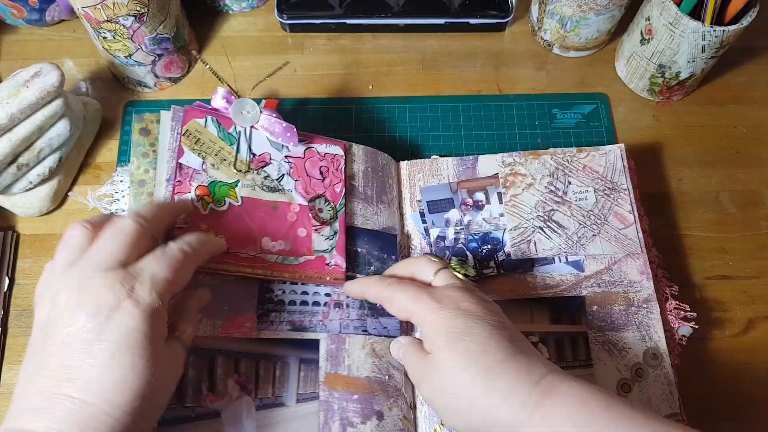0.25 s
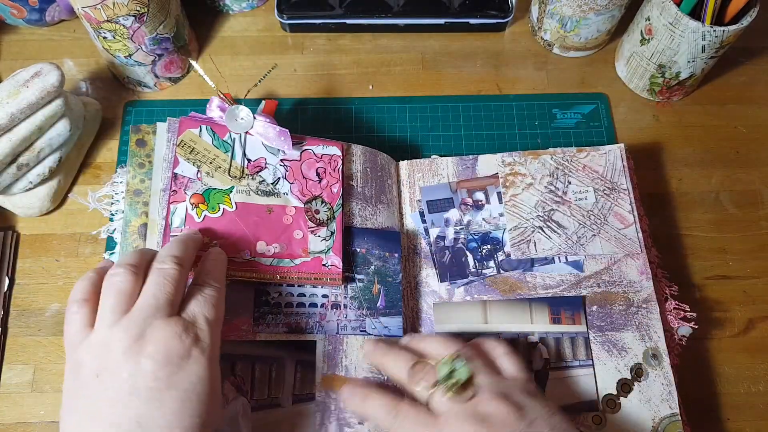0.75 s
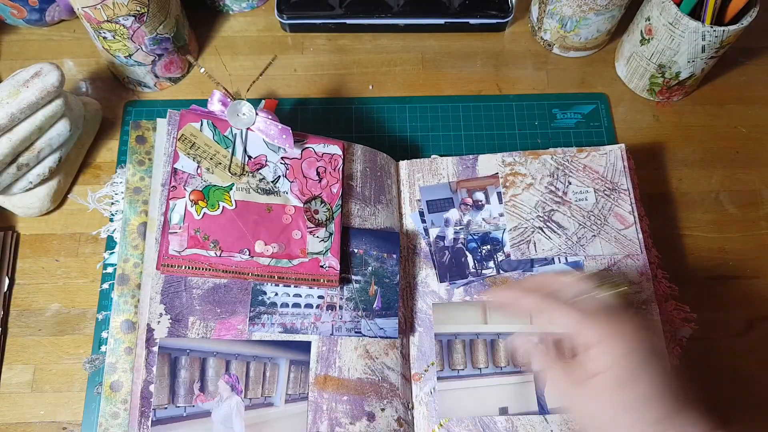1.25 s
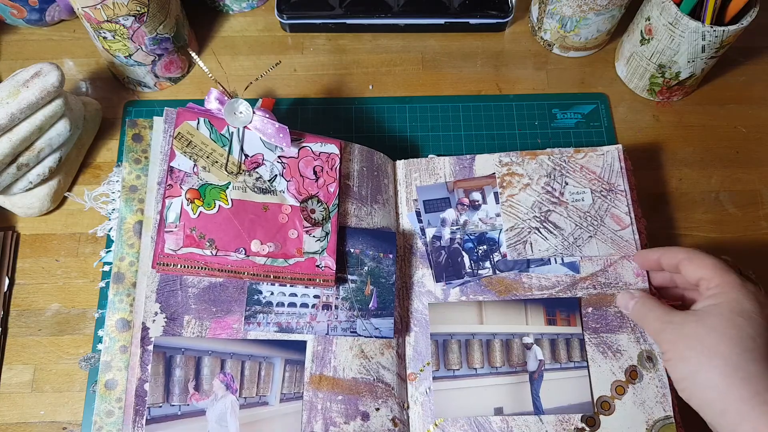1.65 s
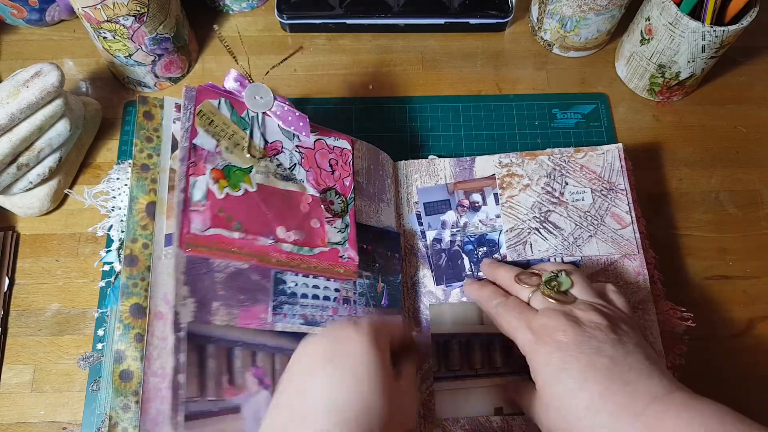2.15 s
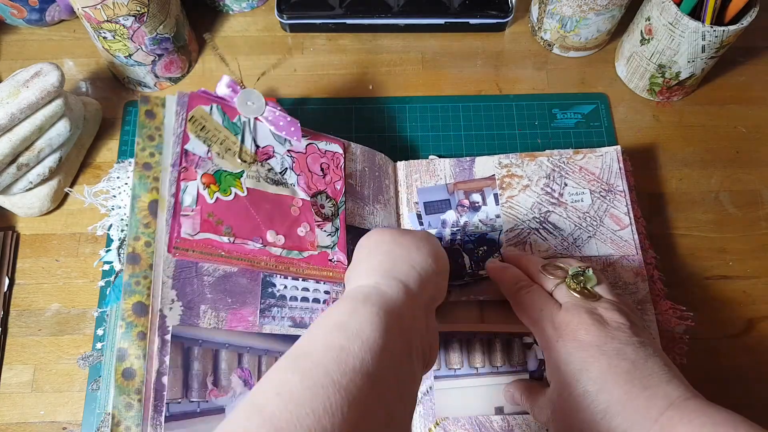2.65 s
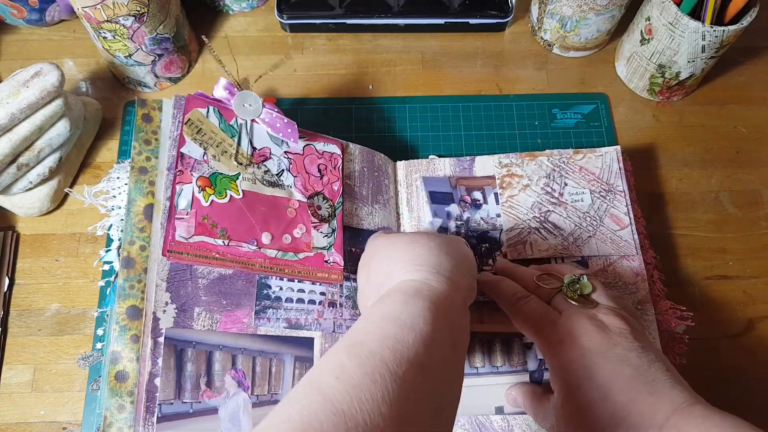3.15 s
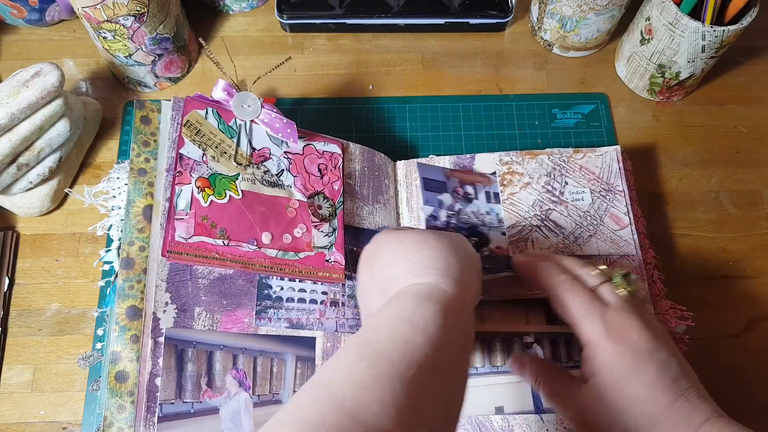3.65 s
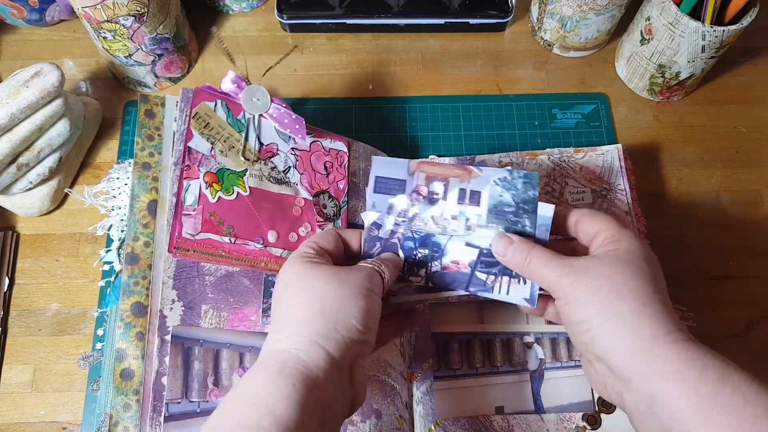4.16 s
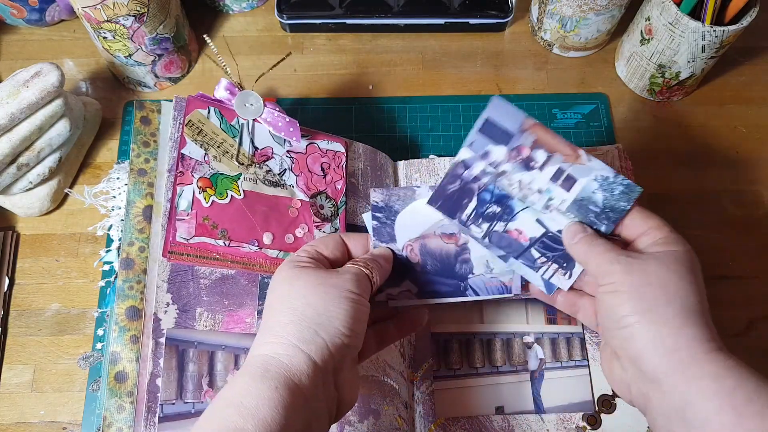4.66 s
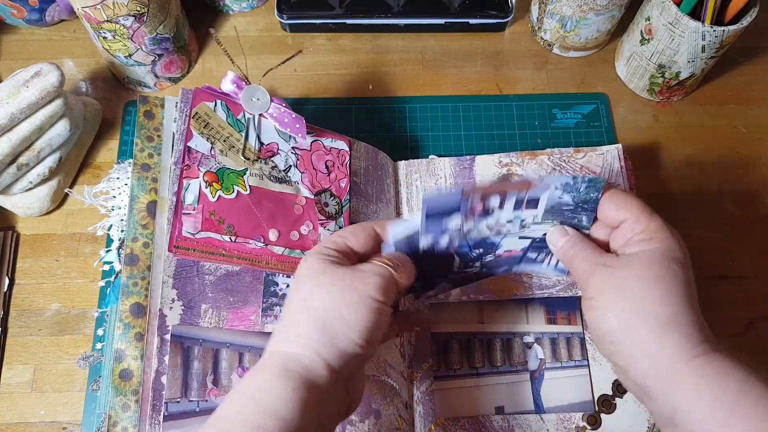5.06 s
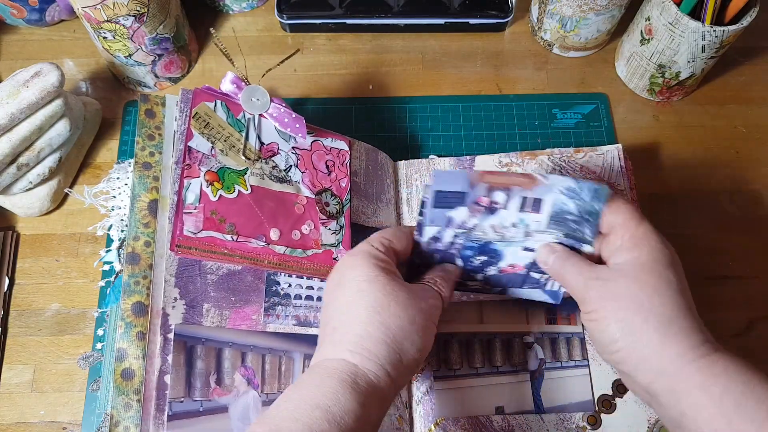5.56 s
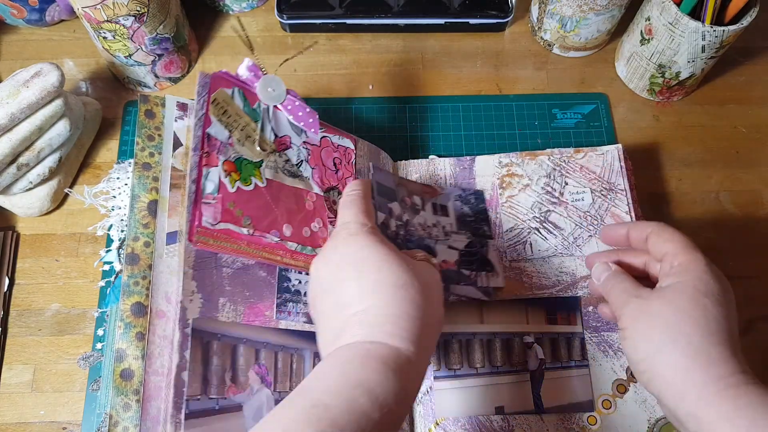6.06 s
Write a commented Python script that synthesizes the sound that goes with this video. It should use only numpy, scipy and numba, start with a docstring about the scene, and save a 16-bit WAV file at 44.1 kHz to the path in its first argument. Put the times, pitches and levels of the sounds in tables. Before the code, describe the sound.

Fingers handle the pages of a thick journal on a table, making soft rustles and small crinkles. After a quieter moment they rub inside a paper pocket, with a slightly hollow scraping and crisp snaps. Photos slide apart with a thin hiss, then are knocked square in one quick, much louder clatter. More rustling follows. The sound is close, in a quiet room with a faint low hum.

```python
"""Fingers rustle through the pages of a thick handmade journal on a table, over a quiet room hum.
They rub in a paper pocket; glossy photos slide out, fan apart and are knocked square on the page.
Fibres slip in dense tiny jerks that hiss from the sheet and ring the hollows between pages;
creases snap, faint whistles waver in the hiss, and the photos' edges ring the book."""
import sys
import numpy as np
from scipy import signal
from scipy.fft import rfft, irfft
from scipy.io import wavfile
from scipy.ndimage import uniform_filter1d
from numba import njit

SR = 44100
rng = np.random.default_rng(int(sys.argv[2]) if len(sys.argv) > 2 else 0)


def pcm_store(signal):
    """Save signal as 16-bit PCM."""
    levels = np.round(np.clip(np.atleast_2d(signal), -1, 1) * 32767)
    wavfile.write(sys.argv[1], SR, levels.astype(np.int16).T)


N = 278712
LEAN_DB = 3.5  # left over right


def undb(db):
    return 10 ** (np.asarray(db) / 20)


def unit(x):
    return x / np.sqrt(np.mean(x ** 2))


def decay(t, t60_s):
    return np.exp(-np.log(1000) * t / t60_s)


def band(x, lo_hz, hi_hz, order=2):
    sos = signal.butter(order, [lo_hz, min(hi_hz, .45 * SR)], "band", fs=SR, output="sos")
    return signal.sosfilt(sos, x)


def curves(rows):
    """Rows of (time in seconds, values..) as one sample-rate curve per value."""
    times_s, *columns = np.transpose(rows)
    return [np.interp(np.arange(N) / SR, times_s, column) for column in columns]


def flicker(rate_hz):
    """Ramps between random levels; spread near 1."""
    hold = int(SR / rate_hz)
    return 1.2 * uniform_filter1d(np.repeat(rng.standard_normal(N // hold + 1), hold), hold)[:N]


def stereo(mid, side, width):
    """Left and right from mid and side, leaning left."""
    sign = np.array([[1], [-1]])
    return (mid + width * sign * side) * undb(sign * LEAN_DB / 2)


def fibre_slips(per_s, spread_db, friction, patchy_db):
    """Stick-slip jerks of paper fibres, a few much larger than the rest, over smooth friction; rms 1."""
    chance, size, noise = rng.random(N), rng.exponential(size=N), rng.standard_normal(N)
    jerks = (chance < per_s / SR) * undb(spread_db * np.minimum(size, 4)) * np.sign(noise)
    return unit((unit(jerks) + friction * noise) * undb(patchy_db * flicker(80)))


# Each row: peak time, 20 dB rise and 20 dB fall in seconds, rustle level in dB, low part, high part
# and hiss in dB re rustle, top octave in dB re hiss, thud in dB re rustle.
PAPER_STROKES = [(0.029, 0.068, 0.15, -77, -13, -1, 11.5, 11, -30),
                 (0.088, 0.057, 0.09, -52, -22, -6, -4.5, 1.5, -28),
                 (0.155, 0.048, 0.075, -59, 2, -5, -13, 8, -27),
                 (0.214, 0.36, 0.12, -60, 0.5, -1, -3, 1.5, -17),
                 (0.313, 0.049, 0.091, -67.5, 2.5, -1.5, 5.5, -2, -2),
                 (0.435, 0.0067, 0.145, -85.5, -12, 4, 16.5, 3.5, -26),
                 (0.504, 0.089, 0.055, -70.5, -9, -5, 2.5, -1, -30),
                 (0.649, 0.038, 0.14, -70.5, -0.5, -3.5, -7.5, -9, 6.5),
                 (0.788, 0.013, 0.12, -67.5, 7, 4, 2, 0.5, 1),
                 (1.14, 0.13, 0.11, -74.5, -4, 3, 3.5, 3.5, -32),
                 (1.556, 0.022, 0.062, -92.5, 0, -14, 6, 16, -5),
                 (1.624, 0.11, 0.15, -79.5, 6.5, 6, 3, -15, 1),
                 (1.75, 0.2, 0.13, -90.5, -3, -6, -25, -7, 22),
                 (1.931, 0.02, 0.39, -65.5, -11, -27, -16.5, 6, -8.5),
                 (2.122, 0.16, 0.062, -62, -10, -10, -0.5, -3, -32),
                 (2.297, 0.025, 0.45, -69.5, -8, 1.5, 6, 0.5, -11),
                 (2.397, 0.02, 0.11, -47, 4.5, -3.5, -12.5, -1, -21),
                 (2.47, 0.02, 0.069, -62.5, -1, -1, 3, -11, -20),
                 (2.528, 0.084, 0.026, -50, -17, -3.5, -2.5, -13, -17),
                 (2.604, 0.056, 0.19, -45.5, -3.5, -4, -4, -8, -30),
                 (2.654, 0.065, 0.045, -47, 0.5, 5, -11, -2, -15),
                 (2.727, 0.23, 0.067, -53, -22, 2.5, -4, 3, -24),
                 (2.789, 0.019, 0.12, -52.5, 4.5, -1, -20, 1, -29),
                 (2.852, 0.052, 0.047, -47, 11.5, 4.5, -8.5, -4, -5),
                 (2.914, 0.045, 0.078, -69, -11, 6.5, 6.5, 1.5, -1),
                 (3.038, 0.04, 0.2, -65.5, -6, 8, 3.5, -22, -30),
                 (3.1, 0.043, 0.057, -60.5, 13, 4.5, 1, -23, -15),
                 (3.14, 0.09, 0.087, -64, -16, 1, 4.5, -5, -1),
                 (3.35, 0.043, 0.065, -71, -23, 2, 4, -2.5, -30),
                 (3.487, 0.018, 0.12, -54.5, -1, -9, -8, -16, -3.5),
                 (3.528, 0.014, 0.044, -48.5, -14, 5.5, -1.5, 3, -28),
                 (3.656, 0.09, 0.19, -61.5, -14, 7.5, 1, 7.5, -32),
                 (3.689, 0.0087, 0.082, -54, 2, 0, -0.5, -14, 0),
                 (3.777, 0.121, 0.14, -61.5, -6.5, 7, 10.5, 1, -14),
                 (3.857, 0.3, 0.14, -59, -14.5, 3.5, 2.5, -6.5, -30),
                 (4.027, 0.014, 0.075, -65, 2.5, 5.5, 1.5, 7, -1),
                 (4.122, 0.026, 0.03, -73.5, -6, -20, 1.5, 9, -14),
                 (4.229, 0.13, 0.72, -80.5, -10, -9, 0.5, 11.5, 4),
                 (4.435, 0.062, 0.14, -60, -17, -12, -4, 4.5, -10),
                 (4.668, 0.33, 0.055, -79.5, -7, -13, 13.5, 1.5, -30),
                 (4.766, 0.11, 0.16, -83.5, 0, -3, 15, 2, -23),
                 (4.874, 0.014, 0.37, -84.5, 2, -7, 8, 7, -30),
                 (4.96, 0.018, 0.076, -74.5, -18, 1, 4, -18, -30),
                 (5.194, 0.31, 0.56, -82.5, -6, -3, 3.5, -3, -30),
                 (5.308, 0.015, 0.097, -42, 3.5, -3, -9.5, -16, -23),
                 (5.442, 0.062, 0.038, -47, 1, 0.5, -0.5, -4.5, 2.5),
                 (5.504, 0.038, 0.068, -56.5, -2, 1, 2.5, -4, 5),
                 (5.632, 0.27, 0.051, -61.5, -15, -9, 2, -3, -23),
                 (5.693, 0.058, 0.076, -61, -26, -6.5, -4, 4, -16),
                 (5.737, 0.0077, 0.099, -62, -4, -7, 4, -4, 2),
                 (5.952, 0.022, 0.3, -53, -1, 1, -6.5, -10, -12.5),
                 (6.069, 0.11, 0.19, -50, -4, 0.5, -3.5, -8, -33),
                 (6.185, 0.2, 0.36, -57.5, 1.5, 8.5, 3.5, -7.5, -11)]


def stroke_gains(*parts_db):
    """Each stroke of hand or photo swells and dies; overlaps add in power. One gain curve per part."""
    peak_s, rise_s, fall_s = np.transpose(PAPER_STROKES)[:3, :, None]
    grid = np.arange(0, N + 64, 64)
    late_s = grid / SR - peak_s
    shape_db = -20 * np.where(late_s < 0, -late_s / rise_s, late_s / fall_s)
    gains = np.sqrt(undb(parts_db) ** 2 @ undb(shape_db) ** 2)
    return [np.interp(np.arange(N), grid, gain) for gain in gains]


@njit
def resonate(x, hz, q):
    """State-variable band-pass with a moving centre, gain 1 there."""
    y, band_state, low_state = np.empty(len(x)), 0., 0.
    for i in range(len(x)):
        g = np.tan(np.pi * hz[i] / SR)
        passed = (band_state + g * (x[i] - low_state)) / (1 + g * (g + 1 / q))
        band_state = 2 * passed - band_state
        low_state += 2 * g * passed
        y[i] = passed / q
    return y


# Air enclosed between pages. Each row: start and end in seconds, low, middle and high resonance in Hz,
# closure from 0 to 1.
PAGE_HOLLOWS = [(0.0, 0.364, 770, 1230, 2220, 0.2), (0.617, 0.89, 465, 1226, 2060, 0.32),
                (1.957, 2.157, 840, 1235, 2510, 0.16), (2.38, 2.54, 562, 1100, 2750, 0.06),
                (2.563, 2.767, 493, 1430, 2675, 0.43), (2.791, 2.984, 734, 1773, 2390, 0.42),
                (3.06, 3.18, 570, 1520, 2280, 0.3), (5.927, 6.325, 800, 1840, 2650, 0)]
# Q of the low, middle and high resonance.
RESONANCE_Q = (11, 16.4, 9.6)
# Low, middle and high part of the rustle. Each row: lower and upper edge in Hz.
RUSTLE_BANDS_HZ = ((350, 880), (1000, 1970), (2000, 3350))


def finger_rub():
    """Coarse jerks rustle, heavy pages thud, and hollows ring where pages close round the fingers."""
    db, low_db, high_db, _, _, thud_db = np.transpose(PAPER_STROKES)[3:]
    low_gain, middle_gain, high_gain, thud_gain = stroke_gains(db + low_db, db, db + high_db, db + thud_db)
    *hollow_hz, closure = curves([(s, *air) for start, end, *air in PAGE_HOLLOWS for s in (start, end)])
    t = np.arange(N) / SR
    inside = sum((t > start) & (t < end) for start, end, *_ in PAGE_HOLLOWS)
    closure = np.clip(uniform_filter1d(closure * inside, size=400), 0, .9)
    layers = []
    for _ in range(2):
        slips = fibre_slips(per_s=1300, spread_db=3.2, friction=1.1, patchy_db=1.6)
        rings = [unit(resonate(resonate(slips, hz, q), hz, q / 2))
                 for hz, q in zip(hollow_hz, RESONANCE_Q)]
        rustles = [unit(band(slips, *edges)) for edges in RUSTLE_BANDS_HZ]
        low, middle, high = (np.sqrt(closure) * ring + np.sqrt(1 - closure) * rustle
                             for ring, rustle in zip(rings, rustles))
        thud = unit(band(slips, 160, 343))
        # Adjacent bands meet in opposite phase, so the middle is inverted.
        layers.append(low_gain * low - middle_gain * middle + high_gain * high + thud_gain * thud)
    bright_side = signal.lfilter([1, -.8], 1, layers[1])
    return stereo(layers[0], bright_side, width=1.96)


def sheet_slide():
    """Fine, dense jerks hiss as one sheet drags over another."""
    db, _, _, hiss_db, top_db, _ = np.transpose(PAPER_STROKES)[3:]
    hiss_gain, top_gain = stroke_gains(db + hiss_db, db + hiss_db + top_db)
    layers = []
    for _ in range(2):
        slips = fibre_slips(per_s=3000, spread_db=3.5, friction=1.3, patchy_db=1.1)
        hiss, top = unit(band(slips, 3210, 7350)), unit(band(slips, 7350, 15600))
        layers.append(hiss_gain * hiss - top_gain * top)
    return stereo(*layers, width=1)


def shaped_noise(spectrum):
    """Steady noise from rows of (Hz, dB); rms 1."""
    hz, db = np.transpose(spectrum)
    bins_hz = np.arange(N // 2 + 1) * SR / N + 1
    bins_db = np.interp(np.log(bins_hz), np.log(hz), db, -120, -120)
    return unit(irfft(rfft(rng.standard_normal(N)) * undb(bins_db), N))


# Room hum. Each row: time in seconds, rumble level in dB, drone level in dB.
HUM_LEVELS = [(0.0, -72, -75.5), (0.26, -67.5, -67), (0.56, -81, -76.5), (0.77, -72, -64.5),
              (1.14, -79, -76.5), (1.78, -78, -70.5), (2.36, -70, -72.5), (2.66, -69, -64.5),
              (3.26, -67, -73.5), (3.98, -64, -71.5), (4.89, -67.5, -76.5), (5.28, -64, -73.5),
              (5.54, -62, -65), (6.04, -67, -61), (6.32, -67, -67.5)]
# Drone and air spectra. Each row: frequency in Hz, relative density in dB.
DRONE_SPECTRUM = [(47, -78), (80, -3), (124, 4), (172, -21.5), (265, -1.5), (447, -6.5), (533, -18.5),
                  (600, -43), (780, -66), (1320, -120)]
AIR_SPECTRUM = [(500, -0.5), (1200, 0), (2600, -7), (4000, -11.5), (8000, -14), (12000, -6), (15800, -8)]


def room_tone():
    """A throbbing rumble near 50 Hz and a low drone, both nearly mono, under faint wide air."""
    rumble_db, drone_db = curves(HUM_LEVELS)
    rumble = stereo(*[unit(band(rng.standard_normal(N), 36.2, 62.2)) for _ in range(2)], width=0.2)
    drone = stereo(shaped_noise(DRONE_SPECTRUM), shaped_noise(DRONE_SPECTRUM), width=0.27)
    air_db = -80 + .5 * flicker(2.8)
    air = stereo(shaped_noise(AIR_SPECTRUM), shaped_noise(AIR_SPECTRUM), width=1)
    return undb(rumble_db) * rumble + undb(drone_db) * drone + undb(air_db) * air


def crack(noise, t60_s):
    """A bright burst that dies quickly."""
    t = np.arange(len(noise)) / SR
    return .4 * band(noise * decay(t, t60_s), 2930, 13500)


# Creases and taps. Each row: start in seconds, ring peak in dB, pitch in Hz, crack in dB re ring,
# T60 in seconds.
CREASES = [(0.027, -53.5, 1930, 31.5, 0.0057), (0.081, -46, 1660, 6.5, 0.052),
           (0.098, -54, 2200, 15, 0.045), (0.247, -41.5, 1100, -7, 0.017), (0.31, -49, 760, -9, 0.028),
           (0.431, -63.5, 4900, 22.5, 0.015), (0.634, -63.5, 1120, 10, 0.02),
           (0.731, -68, 885, 14.5, 0.039), (0.781, -61, 1180, 11.5, 0.048), (1.557, -66, 501, 6, 0.02),
           (1.608, -52.5, 2050, 2, 0.019), (1.907, -61, 1670, -23, 0.021), (1.928, -57.5, 1620, -9, 0.032),
           (2.378, -47, 900, 0, 0.015), (2.392, -41.5, 570, -14, 0.031), (2.401, -41, 590, -3, 0.041),
           (2.571, -41, 830, 4, 0.017), (2.587, -34, 1540, 1, 0.032), (2.777, -62, 834, -6, 0.022),
           (2.884, -31, 770, -9, 0.015), (3.006, -62, 1200, 8, 0.016), (3.064, -38.5, 690, -17, 0.024),
           (3.089, -39.5, 510, -17, 0.11), (3.469, -52.5, 507, -23, 0.022), (3.491, -48, 840, 8, 0.077),
           (3.513, -33, 1905, -6, 0.028), (3.645, -54, 2100, 20.5, 0.041), (3.685, -27.5, 2250, -6, 0.024),
           (3.857, -55, 1320, 6, 0.027), (4.03, -37, 1470, 2.5, 0.024), (4.119, -73, 1280, -4, 0.022),
           (4.229, -59, 505, 11, 0.057), (4.256, -68, 590, 1, 0.014), (4.618, -52, 4640, 7, 0.021),
           (4.657, -52, 4470, 13, 0.048), (4.874, -63.5, 1490, 19, 0.028), (4.964, -63, 3140, -2, 0.044),
           (5.45, -39.5, 1350, 10.5, 0.015), (5.498, -34.5, 1510, 1.5, 0.075),
           (5.628, -44.5, 4120, -1, 0.066), (5.739, -41, 3020, 11.5, 0.024), (5.963, -39, 496, -19, 0.071),
           (5.976, -39.5, 1780, -3, 0.024)]
HIT_SAMPLES = 4096


def crease_snaps():
    """Each crease gives a short dull ring around its pitch and a bright crack."""
    out, t = np.zeros((2, N + HIT_SAMPLES)), np.arange(HIT_SAMPLES) / SR
    for start_s, db, hz, crack_db, t60_s in CREASES:
        ring_noise, crack_noise = rng.standard_normal((2, 2, HIT_SAMPLES))
        envelope = (1 - np.exp(-t / 0.0006)) * decay(t, t60_s)
        rings = band(ring_noise, hz / 1.9, hz * 1.47) * envelope
        rings /= np.abs(rings[0]).max()
        cracks = undb(crack_db) * np.array([crack(noise, t60_s) for noise in crack_noise])
        i = int(start_s * SR)
        out[:, i:i + HIT_SAMPLES] += undb(db) * stereo(*(rings + cracks), width=0.5)
    return out[:, :N]


# Each row: start in seconds, length in seconds, pitch in Hz, level in dB.
THIN_WHISTLES = [(4.453, 0.071, 3500, -69), (4.593, 0.033, 3900, -77), (4.644, 0.12, 2560, -76),
                 (4.82, 0.025, 3510, -66.5)]


def thin_whistles():
    """Faint, brief, narrow whistles at 2.5-4 kHz waver in the sliding hiss."""
    out, t = np.zeros(N), np.arange(N) / SR
    for start_s, length_s, hz, db in THIN_WHISTLES:
        swell = np.sin(np.pi * np.clip((t - start_s) / length_s, 0, 1))
        out += undb(db) * swell * unit(band(rng.standard_normal(N), hz - 90, hz + 90))
    return stereo(out, 0, width=0)


# Photo edges landing. Each row: start in seconds, ring peak in dB, crack in dB re ring.
EDGE_LANDINGS = [(5.278, -18.5, -15), (5.283, -11.5, -11), (5.287, -26, -11), (5.2909, -12, -21),
                 (5.2939, -18.5, -2), (5.2990, -21, -21), (5.3122, -15.5, -33), (5.3206, -23, -35),
                 (5.324, -27.5, -31), (5.3310, -30, -24), (5.334, -32, -24)]
# Each row: frequency in Hz, relative level in dB before the bass cut, T60 in seconds.
BOOK_MODES = [(250, -45, 0.022), (550, 0, 0.1), (645, -7, 0.031), (850, 9.5, 0.021), (1055, 9.5, 0.011),
              (1510, 8.5, 0.011), (2160, 4.5, 0.008), (3480, 1, 0.003)]


def photo_knocks():
    """The photos land edge first, a few at a time; each blow favours other modes of the thick book."""
    out, t = np.zeros((2, N + HIT_SAMPLES)), np.arange(HIT_SAMPLES) / SR
    for start_s, db, crack_db in EDGE_LANDINGS:
        scatter_db = rng.normal(0, 2.5, len(BOOK_MODES))
        tunings = rng.normal(1, 0.017, len(BOOK_MODES))
        ring = sum(undb(mode_db + extra_db) * np.sin(2 * np.pi * hz * tuning * t) * decay(t, t60_s)
                   for (hz, mode_db, t60_s), extra_db, tuning in zip(BOOK_MODES, scatter_db, tunings))
        ring = band(ring, 400, 9000)  # small sheets push little bass
        ring /= np.abs(ring).max()
        cracks = [undb(crack_db) * crack(rng.standard_normal(HIT_SAMPLES), t60_s=.014) for _ in range(2)]
        i = int(start_s * SR)
        out[:, i:i + HIT_SAMPLES] += undb(db) * stereo(ring + cracks[0], cracks[1], width=0.7)
    return out[:, :N]


def reflections(sound, t60_s, level_db):
    """The table top and near walls return a short, dull tail."""
    t = np.arange(SR // 2) / SR
    tail = band(rng.standard_normal((2, len(t))), 450, 3900, order=1) * decay(t, t60_s) * (t > .003)
    tail /= np.sqrt(np.sum(tail ** 2, axis=1, keepdims=True))
    return undb(level_db) * signal.fftconvolve(sound, tail, axes=1)[:, :N]


def scene():
    paper = sheet_slide() + finger_rub() + crease_snaps() + photo_knocks() + thin_whistles()
    return paper + reflections(paper, t60_s=0.056, level_db=-13) + room_tone()


def record(dry):
    """The phone drops the deepest bass and cuts the top steeply."""
    low_cut_hz, high_cut_hz = 36, 15850
    thin = signal.sosfilt(signal.butter(3, low_cut_hz, "high", fs=SR, output="sos"), dry)
    return signal.sosfilt(signal.ellip(10, .2, 80, high_cut_hz, fs=SR, output="sos"), thin)


dry = scene()
out = record(dry)
pcm_store(out)
```